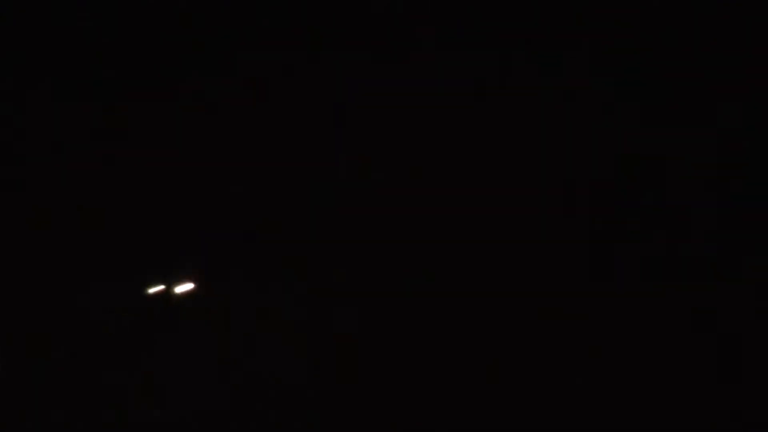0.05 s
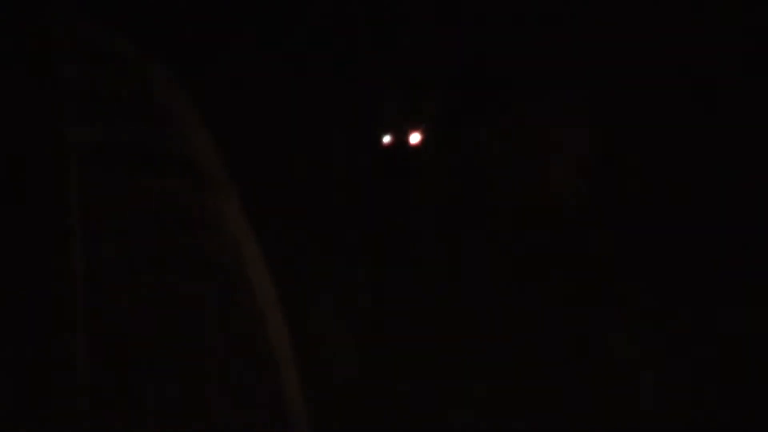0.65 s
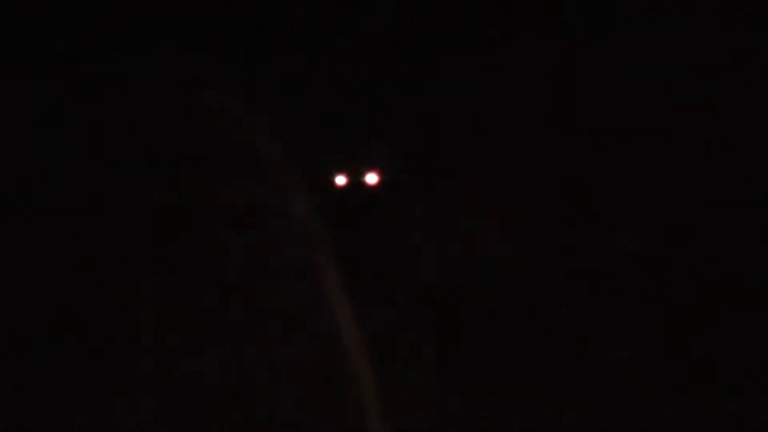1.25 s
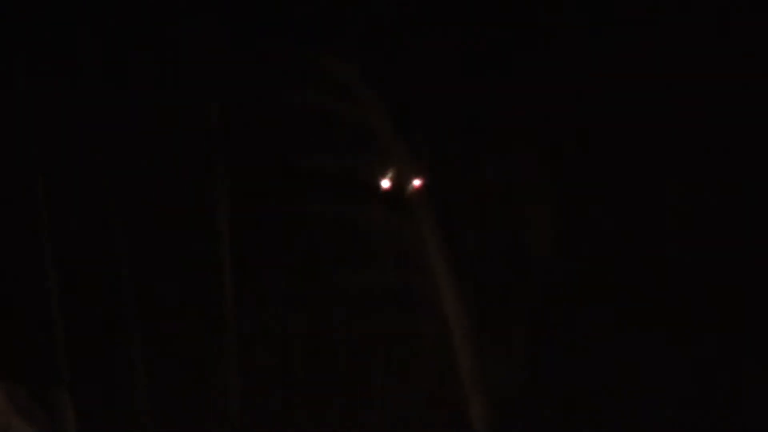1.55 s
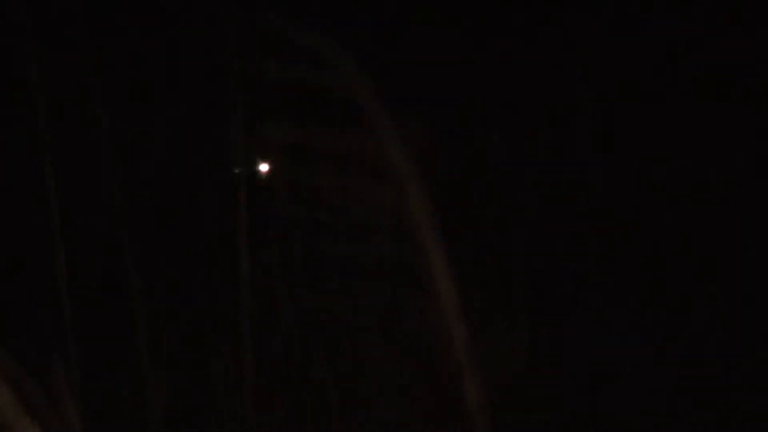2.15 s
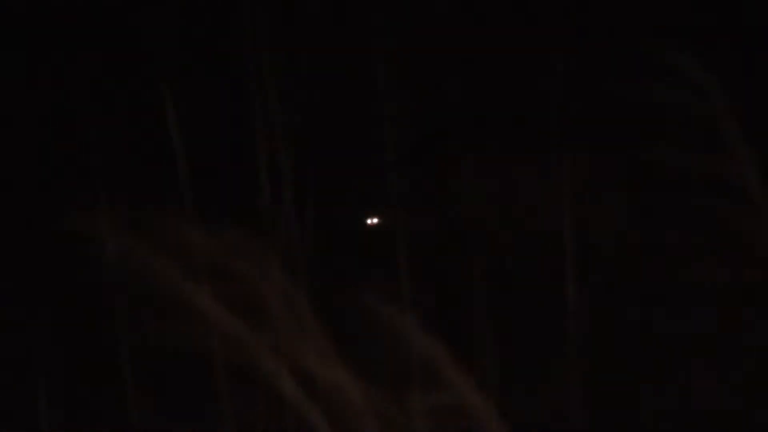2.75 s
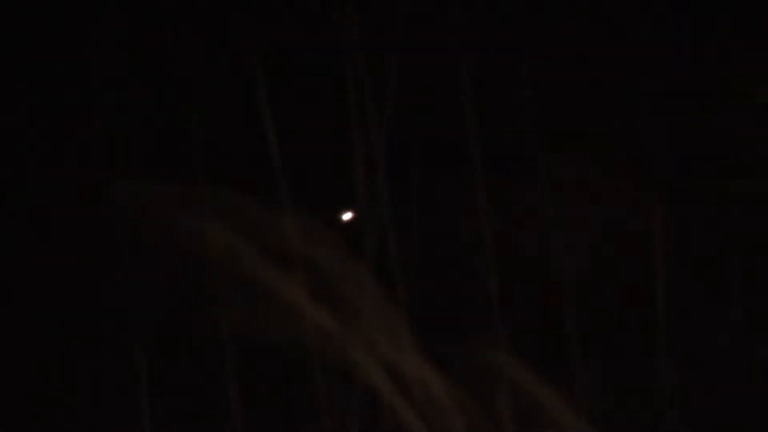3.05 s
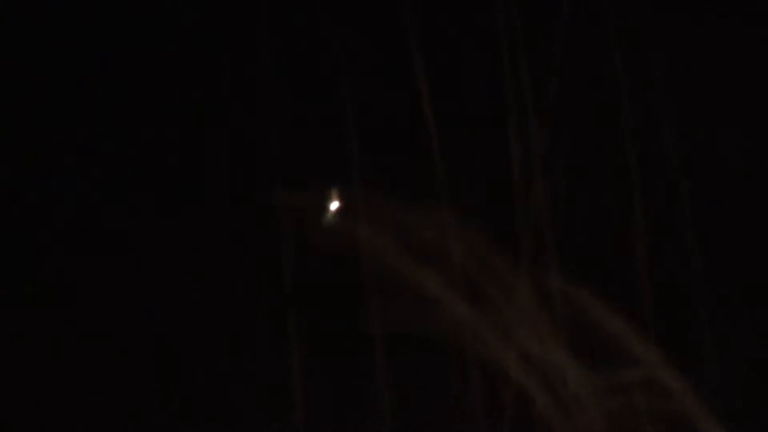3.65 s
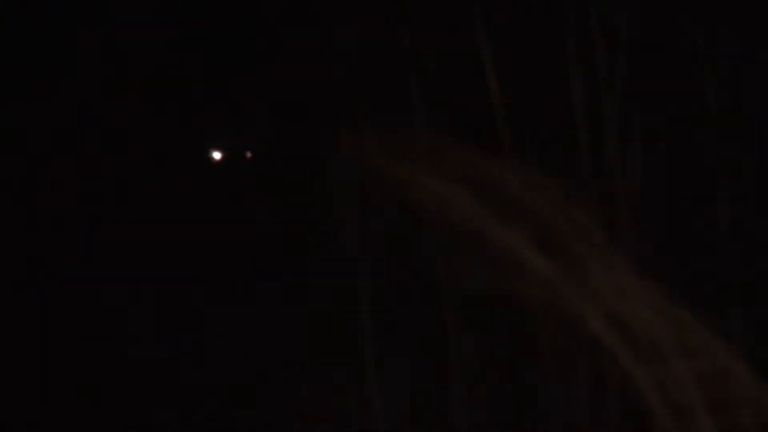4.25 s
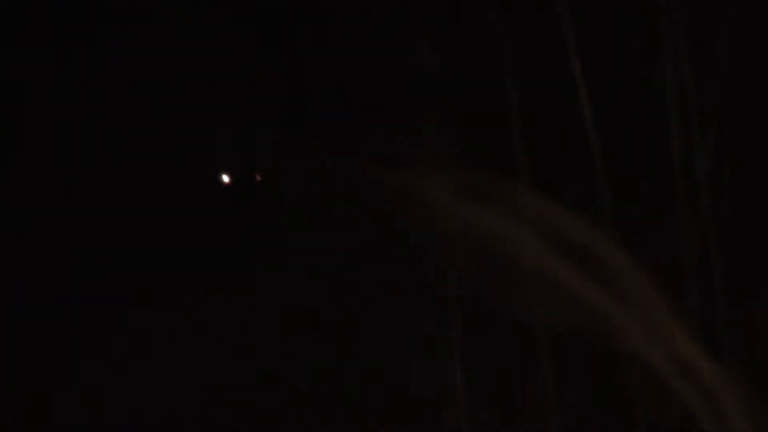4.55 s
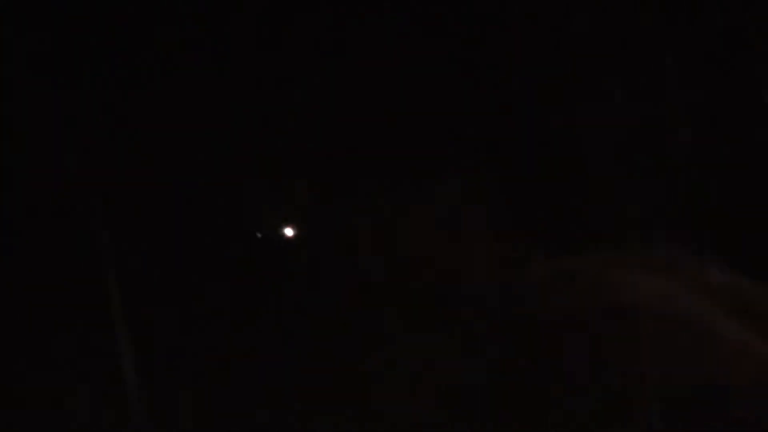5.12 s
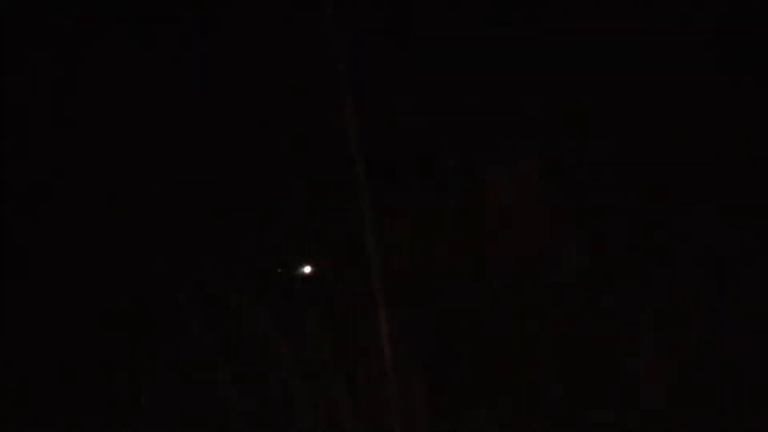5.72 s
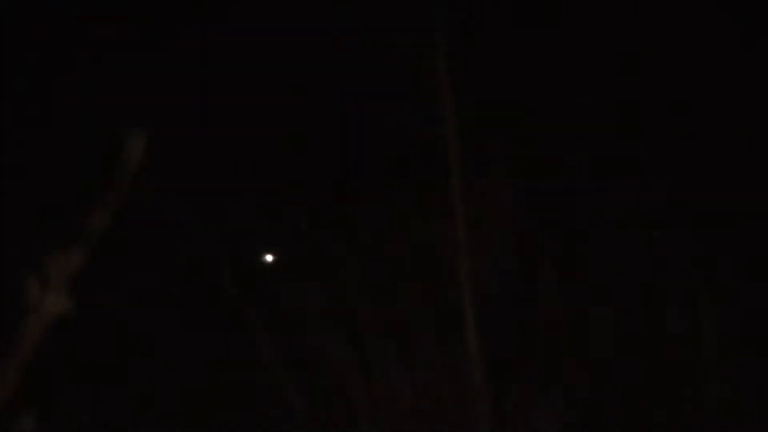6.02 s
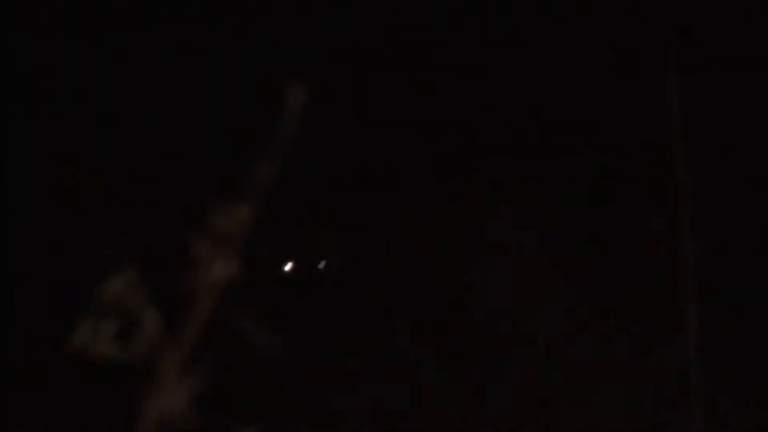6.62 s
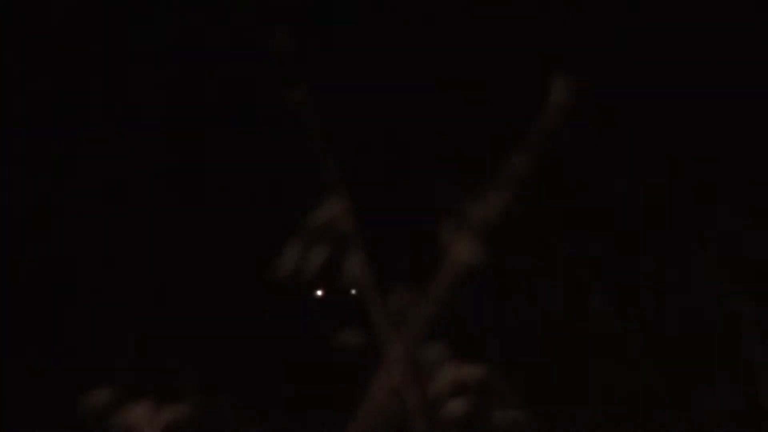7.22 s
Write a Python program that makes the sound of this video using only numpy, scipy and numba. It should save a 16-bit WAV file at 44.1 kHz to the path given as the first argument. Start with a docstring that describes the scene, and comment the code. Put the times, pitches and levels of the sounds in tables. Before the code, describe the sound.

A night bird screams six times close by, harsh and high, while wind gusts rumble and knock on the microphone over faint insects.

```python
"""A gust buffets the microphone and at once a night bird screams, six times in all, close by. Each call
starts harsh, may clear into a whistle, then rasps and drops away. The voice is a source and filter:
one syrinx tone breaks up into subharmonics and chaos and rings the windpipe and the open beak, and
interference from a nearby surface hollows it. Further gusts rumble and knock at the microphone ports,
over a faint chorus of insects and hiss."""
import sys
import numpy as np
from scipy import signal
from scipy.fft import rfft, irfft
from scipy.io import wavfile
from scipy.ndimage import uniform_filter1d
from numba import njit

SR = 44100
rng = np.random.default_rng(int(sys.argv[2]) if len(sys.argv) > 2 else 0)


def bounce(signal):
    """Save signal as a 16-bit WAV file at the path given by the first command-line argument."""
    frames = np.transpose(np.atleast_2d(signal))
    limited = np.clip(frames, -1, 1)
    pcm = np.round(limited * 32767).astype(np.int16)
    wavfile.write(sys.argv[1], SR, pcm)


N = 321048

# spectra of the night hiss and of the wind's rumble: frequency_hz, relative_density_db
HISS_SPECTRUM = [(100, 10.5), (350, 4.5), (1000, 1.5), (2500, -3), (5500, -1), (9500, -5.5), (16000, -7.5)]
WIND_SPECTRUM = [(25, -11), (70, 7.5), (130, 8.5), (200, -0.5), (330, -23.5), (600, -35.5), (1500, -47)]
# bands of the insect chorus: centre_hz, width_hz, level_db
INSECT_BANDS = [(3340, 240, -63), (4095, 100, -68)]
# gusts, rising and falling 20 dB in the times given: start_s, end_s, level_db, rise_s, fall_s, knock_share
WIND_GUSTS = [(0.0, 0.146, -41, 0.069, 0.16, 0.03), (0.277, 0.42, -49.5, 0.066, 0.12, 0),
              (0.538, 0.703, -41.5, 0.045, 0.13, 0.08), (1.546, 1.6, -42.5, .2, 0.088, 0.24),
              (2.58, 2.842, -51.5, 0.05, .1, 0), (2.882, 3.04, -40.5, 0.026, 0.3, 0.05),
              (3.125, 3.45, -34.5, 0.054, 0.52, 0.48), (4.085, 4.191, -49, 0.21, 0.11, 0.03),
              (5.004, 5.265, -39.5, 0.34, 0.085, 0.18), (5.29, 5.75, -34.5, 0.067, 0.053, 0.11),
              (5.89, 6.178, -38.5, 0.087, 0.2, 0.03), (6.19, 6.672, -32.5, 0.24, 0.067, 0.32),
              (6.91, 7.203, -45.5, 0.11, 0.09, 0.1)]
# sudden buffets: peak_s, level_db, half_length_s
WIND_BUFFETS = [(5.583, -23.5, 0.0046), (6.678, -30.5, 0.01), (6.924, -23.5, 0.013), (6.952, -26.5, 0.01),
                (7.177, -35, 0.01)]
# frequencies that near reflections cancel or reinforce: frequency_hz, left_db, right_db
INTERFERENCE = [(1260, 7, 8), (1900, -2.5, -1.5), (2230, -8, -3.5), (3208, -14.5, -13), (4127, 0.5, -14.5),
                (4173, 2, 11), (5514, -11, -14.5), (6205, -21.5, -13.5), (6530, -10.5, 10.5),
                (7170, -14.5, -4.5), (7634, -12, -9.5), (7970, -8.5, -7), (8290, -5, -16)]
# the screams: start_s, end_s, early_beak_db, late_beak_db, windpipe_db, last_pitch_hz, croak_depth
SCREAMS = [(0.116, 0.700, -20.5, -29.5, -34, 1510, 0.42), (1.279, 1.822, -34, -34, -32.5, 1675, 0.4),
           (2.377, 2.977, -22, -30.5, -33, 1380, 0.65), (3.536, 4.22, -20, -31.5, -36, 1492, 0.4),
           (4.931, 5.524, -23.5, -29, -35.5, 776, 0.1), (6.208, 6.751, -19.5, -28.5, -36.5, 1484, 0.47)]
# syrinx pitch in each scream, up to its final drop: time_s, pitch_hz
TUNE_1 = [(0.117, 2708), (0.155, 2547), (0.18, 3285), (0.335, 3093), (0.37, 3628), (0.485, 3275),
          (0.497, 2962), (0.555, 3153), (0.63, 3015)]
TUNE_2 = [(1.292, 3850), (1.37, 3274), (1.47, 3970), (1.497, 3620), (1.565, 3674), (1.612, 3250),
          (1.635, 2900), (1.749, 2773)]
TUNE_3 = [(2.377, 3646), (2.403, 2918), (2.452, 3080), (2.529, 3796), (2.55, 3654), (2.643, 3646),
          (2.795, 3085), (2.841, 2876), (2.901, 3053)]
TUNE_4 = [(3.536, 2685), (3.69, 3035), (3.713, 3365), (3.848, 3792), (4.099, 3470), (4.145, 2655)]
TUNE_5 = [(4.937, 2367), (4.998, 2525), (5.036, 3440), (5.101, 3095), (5.177, 3172), (5.276, 2632),
          (5.295, 2855), (5.441, 2364), (5.5, 1484)]
TUNE_6 = [(6.209, 3916), (6.285, 3690), (6.3, 2963), (6.373, 2980), (6.391, 3412), (6.648, 3500),
          (6.674, 2662)]
TUNES = [TUNE_1, TUNE_2, TUNE_3, TUNE_4, TUNE_5, TUNE_6]
# resonance of the beak, which closes during each scream: time_s, resonance_hz
GAPE_1 = [(0.117, 7370), (0.175, 6400), (0.34, 5500), (0.55, 5490), (0.66, 5250)]
GAPE_2 = [(1.28, 6100), (1.37, 6000), (1.47, 7460), (1.605, 6600), (1.63, 4120), (1.8, 4100)]
GAPE_3 = [(2.378, 7460), (2.41, 7130), (2.55, 6400), (2.79, 6200), (2.82, 4760), (2.97, 4660)]
GAPE_4 = [(3.536, 7650), (3.7, 6880), (3.83, 6320), (3.949, 5720), (4.099, 5620), (4.19, 5000)]
GAPE_5 = [(4.935, 7050), (5.1, 6900), (5.33, 5800), (5.5, 5400)]
GAPE_6 = [(6.21, 7330), (6.35, 7280), (6.39, 6600), (6.64, 5880), (6.721, 5240)]
GAPES = [GAPE_1, GAPE_2, GAPE_3, GAPE_4, GAPE_5, GAPE_6]
# spells in which the syrinx repeats only every few cycles: start_s, end_s, period_cycles, depth
SUBHARMONICS = [(0.16, 0.493, 2, 0.33), (1.602, 1.727, 2, 0), (2.412, 2.454, 5, 0.73),
                (2.807, 2.886, 2, 0.22), (3.533, 3.683, 3, 1), (3.818, 4.01, 3, 0.12), (4, 4.132, 2, 0.35),
                (6.211, 6.29, 2, 1), (6.289, 6.357, 3, 1), (6.382, 6.486, 2, 0.3), (6.525, 6.655, 3, 0.3)]
# surges of effort: start_s, end_s, beak_gain_db
EFFORT_SURGES = [(0.164, 0.19, 4), (1.266, 1.285, 15.5), (1.644, 1.656, 7.5), (2.37, 2.39, 11.5),
                 (2.451, 2.499, 5.5), (3.689, 3.811, 4), (4.13, 4.171, 5), (4.925, 4.972, 6.5),
                 (6.41, 6.487, 4)]
# the voice clears towards a whistle: start_s, end_s, roughness, beak_change_db, windpipe_change_db
WHISTLES = [(0.123, 0.158, 0.64, -1.5, -2), (0.346, 0.474, 0.49, -2, -1.5), (0.492, 0.564, 0.41, 0.5, 2.5),
            (1.287, 1.42, 0.34, 0, -4), (1.416, 1.619, 0.15, -5.5, -6), (2.37, 2.498, 0.4, -3.5, -2.5),
            (2.496, 2.804, 0.17, -6, -7.5), (3.825, 3.896, 0.34, -3, -4), (4.021, 4.157, 0.56, 2, 1),
            (4.937, 5.014, 0.38, -0.5, -3.5), (5.019, 5.271, 0.07, 5, -3.5), (5.311, 5.339, .45, 5, -2),
            (6.363, 6.377, 0.4, -3, 4.5), (6.675, 6.687, 0.65, 3.5, 4.5)]

SIDES = np.array([[1], [-1]])  # opposite signs left and right
DROP_S, DROP_BEND = 0.08, 1.7  # the final drop in pitch, ever steeper


def undb(db):
    """Decibels to amplitude ratio."""
    return 10 ** (np.asarray(db) / 20)


def unit(x):
    """Normalisation to rms 1."""
    return x / np.sqrt(np.mean(x ** 2))


def steady(x, size=400):
    """Division by the envelope holds the short-term rms at 1."""
    return x / np.sqrt(np.abs(uniform_filter1d(x ** 2, size)) + 1e-12)


def ramp(t, start, end):
    """Linear rise from 0 at start to 1 at end."""
    return np.clip((t - start) / (end - start), 0, 1)


def spell(t, start, end, switch_s=0.0061):
    """Trapezoidal window: 1 between start and end, 0 outside."""
    return np.clip(np.minimum(t - start, end - t) / switch_s + 0.5, 0, 1)


def butter(x, order, hz, kind="low"):
    """Butterworth filter, maximally flat in its pass band."""
    return signal.sosfilt(signal.butter(order, hz, kind, fs=SR, output="sos"), x)


def waver(count, rate_hz):
    """Random modulation: low-passed noise of rms 1."""
    return unit(butter(rng.standard_normal(count + SR), 2, rate_hz)[SR:])


def coloured(spectrum):
    """Spectral shaping of white noise, at rms 1."""
    hz, db = np.transpose(spectrum)
    gain = undb(np.interp(np.log(np.fft.rfftfreq(N, 1 / SR) + 1), np.log(hz), db))
    return unit(irfft(rfft(rng.standard_normal(N)) * gain, N))


def apart(spectrum, low_hz, high_hz):
    """Antiphase noise: the part that differs between the two microphone ports."""
    return SIDES * butter(coloured(spectrum), 1, [low_hz, high_hz], "band")


@njit
def bandpass(x, hz, width_hz):
    """A damped resonator in state-variable form, with moving centre and width."""
    y, band_state, low_state = np.empty(len(x)), 0., 0.
    for i in range(len(x)):
        step, damping = np.tan(np.pi * hz[i] / SR), width_hz[i] / hz[i]
        band = (band_state + step * (x[i] - low_state)) / (1 + step * (step + damping))
        band_state = 2 * band - band_state
        low_state += 2 * step * band
        y[i] = damping * band
    return y


def resonate(x, hz, width_hz):
    """Two equal resonators in cascade give a steep resonance."""
    centre, width = hz + np.zeros(len(x)), width_hz + np.zeros(len(x))
    return bandpass(bandpass(x, centre, width), centre, width)


def night(hiss_db=-53.5, side_db=-3, throb_db=1, throb_hz=7.8):
    """Far insects merge into narrow bands of amplitude-modulated noise over a broadband hiss."""
    hiss = coloured(HISS_SPECTRUM) + undb(side_db) * apart(HISS_SPECTRUM, low_hz=150, high_hz=3740)
    out = undb(hiss_db) * hiss
    for hz, width_hz, db in INSECT_BANDS:
        chorus = unit(resonate(rng.standard_normal(N), hz, width_hz))
        out = out + chorus * undb(db + throb_db * waver(N, throb_hz))
    return out


def gusts(t, lull_db=-67.5):
    """Envelopes of rumble and knocking: gusts grow and decay exponentially, and their powers add."""
    deep, knocking = undb(lull_db) ** 2, 0
    for start, end, db, rise, fall, share in WIND_GUSTS:
        down_db = 20 * np.clip(np.maximum((start - t) / rise, (t - end) / fall), 0, 10)
        power = undb(db - down_db) ** 2
        deep = deep + (1 - share) * power
        knocking = knocking + share * power
    return np.sqrt([deep, knocking])


def wind(flutter_db=4.0, flutter_hz=22, side_db=-2, knock_hz=160, knock_width_hz=190, dull_hz=380):
    """Turbulent pressure rumbles and knocks at each port; only the deepest part is alike in both."""
    t = np.arange(N) / SR
    gust, knocking = gusts(t) * undb(flutter_db * waver(N, flutter_hz))
    buffets = sum(undb(db) * np.exp(-((t - peak) / half) ** 2) for peak, db, half in WIND_BUFFETS)
    rumble = steady(coloured(WIND_SPECTRUM), size=1000)
    ports = butter(rng.standard_normal((2, N)), 2, dull_hz)
    knock = np.array([steady(resonate(port, knock_hz, knock_width_hz), size=700) for port in ports])
    side = undb(side_db) * apart(WIND_SPECTRUM, low_hz=290, high_hz=3070)
    return gust * (rumble + side) + (knocking + buffets) * knock


def thicket(x, t60_s=0.65, wet_db=-31):
    """Scattering by stems and trees adds a faint, exponentially decaying tail."""
    t = np.arange(SR // 2) / SR
    tail = rng.standard_normal((2, len(t))) * np.exp(-np.log(1000) * t / t60_s)
    return undb(wet_db) * signal.fftconvolve(x[None], unit(tail) / np.sqrt(len(t)), axes=1)[:, :N]


def reflections(x, half_width_hz=65, gain_db=1, shade_hz=6650, shade_width_hz=850, shade_db=13.0):
    """Interference from a nearby surface sets notches and peaks; the right is shaded in the treble."""
    f = np.fft.rfftfreq(N, 1 / SR)
    db = gain_db + SIDES * shade_db / 2 * np.exp(-((f - shade_hz) / shade_width_hz) ** 2)
    for hz, left_db, right_db in INTERFERENCE:
        db = db + np.array([[left_db], [right_db]]) / (1 + ((f - hz) / half_width_hz) ** 2)
    # echoes only follow the sound, so the response is made causal
    cepstrum = irfft(np.log(undb(db)), N)
    cepstrum[:, 1:] *= 2 * (np.arange(1, N) < N // 2)
    return irfft(rfft(x) * np.exp(rfft(cepstrum)), N)


def sputter(n, hz=5100, width_hz=2200, db=-9, burst_db=7, burst_hz=35):
    """Random amplitude modulation of a noise band gives hoarse bursts, heard even in the whistle."""
    bursts = undb(db + burst_db * 2 * np.tanh(waver(n, burst_hz) / 2))
    return bursts * unit(resonate(rng.standard_normal(n), hz, width_hz))


def effort(t, early_db, late_db, windpipe_db, harsh=0.84, last_rough=0.75,
           attack_s=0.014, attack_db=-5.5, release_s=0.04, release_db=-14):
    """Envelopes of roughness (0-1), beak and windpipe level: breath swells, holds, tires, runs out."""
    attack = attack_db * (1 - ramp(t, t[0], t[0] + attack_s))
    edges = attack + release_db * ramp(t, t[-1] - release_s, t[-1])
    tired = ramp(ramp(t, t[0], t[-1]), 0.096, 0.88)  # between these shares of the scream's length
    surges = sum(db * spell(t, start, end) for start, end, db in EFFORT_SURGES)
    beak_db = early_db + (late_db - early_db) * tired + edges + surges
    rough, pipe_db = harsh, windpipe_db + edges
    for start, end, clear_rough, beak_change, pipe_change in WHISTLES:
        clear = spell(t, start, end)
        rough += (clear_rough - harsh) * clear
        beak_db += beak_change * clear
        pipe_db += pipe_change * clear
    rough += (last_rough - rough) * ramp(t, t[-1] - DROP_S, t[-1])
    return np.clip(rough, 0, 1), beak_db, pipe_db


def roughen(tone, rough, shimmer=0.052, shimmer_hz=400, rasp=0.84, puff_db=2.0, puff_hz=55, low_hz=1500):
    """Chaotic vibration: driven hard, the membranes shudder and the tone gives way to puffs of rasp."""
    n = len(tone)
    noise = butter(rng.standard_normal(n), 4, low_hz, "high")
    chaos = rasp * rough ** 1.16 * undb(puff_db * waver(n, puff_hz)) * noise
    shudder = np.exp(shimmer * rough * waver(n, shimmer_hz))
    return (tone * (1 - rough ** 2 / 2) + chaos) * shudder


def syrinx(t, hz, rough, subharmonics, jitter=0.0514, jitter_hz=500, wobble=0.00666, stagger=0.036,
           wobble_hz=90, rolloff_db=-3, top_hz=7900, falter_db=2.5):
    """A harmonic oscillator whose pitch strays with roughness; period multiplication adds subharmonics."""
    stray = jitter * rough * waver(len(t), jitter_hz)
    stray += (wobble + stagger * rough ** 2) * waver(len(t), wobble_hz)
    phase = 2 * np.pi * np.cumsum(hz * (1 + stray)) / SR
    tone = unit(sum(undb(rolloff_db * k) * np.sin(k * phase) / (1 + (k * hz / top_hz) ** 10)
                    for k in range(1, 9)))
    for start, end, cycles, depth in subharmonics:
        gate = depth * uniform_filter1d(1. * ((t > start) & (t < end)), size=300)
        gate *= undb(falter_db * waver(len(t), wobble_hz))  # the pattern is unstable
        # strong and weak cycles take turns, which puts lines between the harmonics and one below them
        tone = tone + gate * (tone * np.cos(phase / cycles) + np.sin(phase / cycles) / 2)
    return tone


def scream(row, tune, gape, beak_q=3.73, pipe_hz=2800, pipe_width_hz=2300, slack_hz=900, relax_s=0.067,
           edge_hz=8700, leak_db=-17, tremor_db=2.0, tremor_hz=60, air_db=-36, fade_s=0.0023):
    """Source and filter: the syrinx drives the windpipe resonance and the moving one of the beak."""
    start_s, end_s, early_db, late_db, windpipe_db, last_hz, croak_depth = row
    start, end = int(start_s * SR), int(end_s * SR)
    t = np.arange(start, end) / SR
    rough, beak_db, pipe_db = effort(t, early_db, late_db, windpipe_db)
    hz, beak_hz = (np.interp(t, *np.transpose(curve)) for curve in (tune, gape))
    hz += (last_hz - hz) * ramp(t, end_s - DROP_S, end_s) ** DROP_BEND
    croak = (end_s - DROP_S, end_s, 2, croak_depth)  # an octave down, in the final drop
    source = roughen(syrinx(t, hz, rough, SUBHARMONICS + [croak]), rough)
    source = butter(source, 8, edge_hz) + undb(leak_db) * source  # little of the top leaves the throat
    beak = steady(resonate(source, beak_hz, beak_hz / beak_q)) * undb(beak_db)
    beak += rough * undb(beak_db + air_db) * rng.standard_normal(len(t))  # air rushes through the beak
    # the throat goes slack at the end, so its resonance sinks with the pitch
    throat_hz = np.interp(t, [t[-1] - relax_s, t[-1]], [pipe_hz, slack_hz])
    throat = steady(resonate(source, throat_hz, pipe_width_hz))
    pipe = (throat + np.sqrt(rough) * sputter(len(t))) * undb(pipe_db)
    tremor = undb(tremor_db * np.minimum(waver(len(t), tremor_hz), 1))  # dips are deeper than swells
    fade = np.clip(np.minimum(t - t[0], t[-1] - t) / fade_s, 0, 1)
    return np.pad((beak * tremor + pipe) * fade, (start, N - end))


def scene():
    """Superposition of the bird in its thicket, the wind and the night around."""
    bird = sum(scream(row, tune, gape) for row, tune, gape in zip(SCREAMS, TUNES, GAPES))
    return reflections(bird) + thicket(bird) + wind() + night()


def record(dry, low_hz=36, top_hz=15750):
    """Band limiting: the recorder thins the deepest rumble and cuts the top."""
    thinned = butter(dry, 2, low_hz, "high")
    return signal.sosfilt(signal.ellip(10, 0.1, 70, top_hz, fs=SR, output="sos"), thinned)


dry = scene()
out = record(dry)
bounce(out)
```